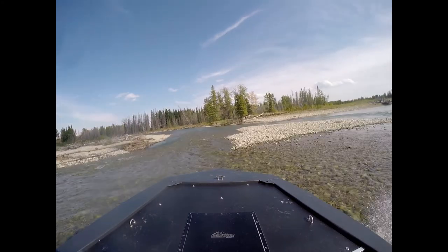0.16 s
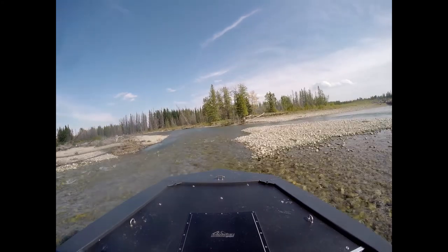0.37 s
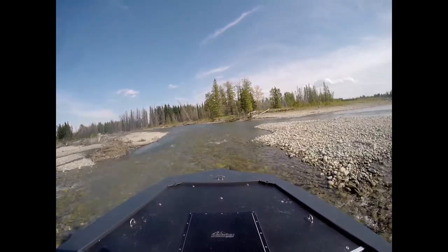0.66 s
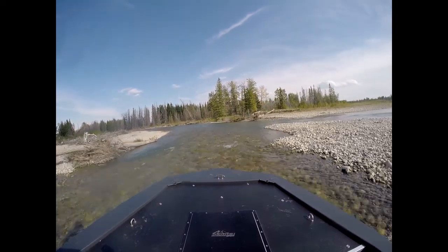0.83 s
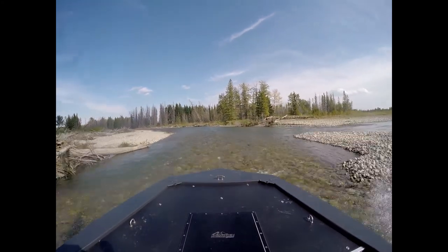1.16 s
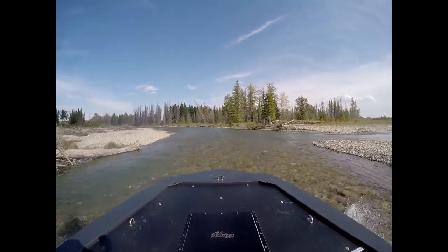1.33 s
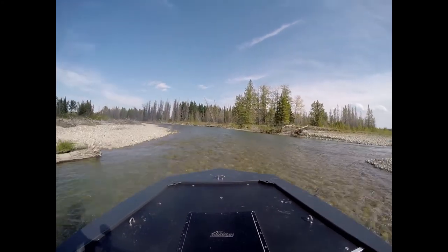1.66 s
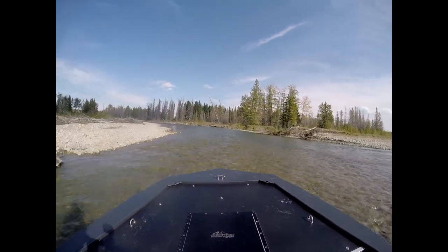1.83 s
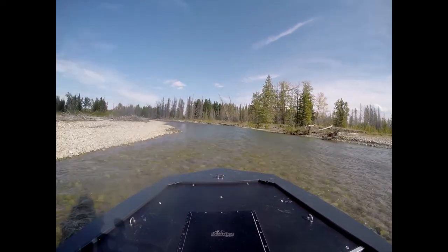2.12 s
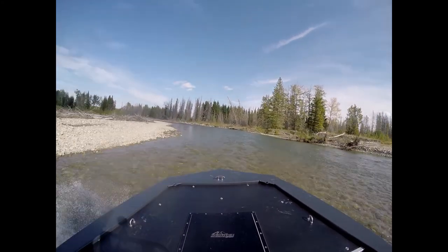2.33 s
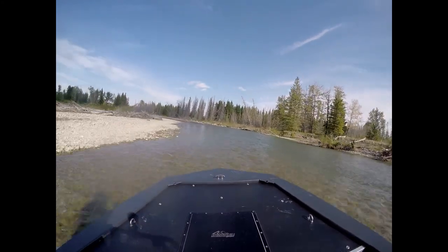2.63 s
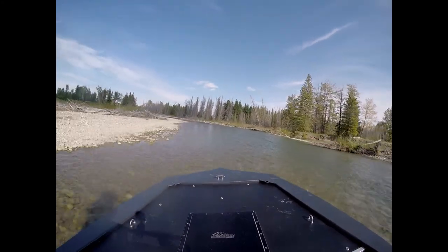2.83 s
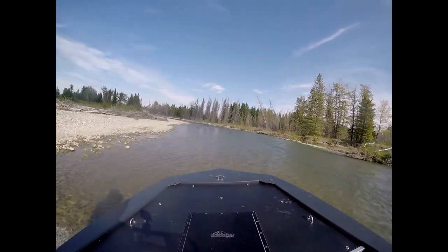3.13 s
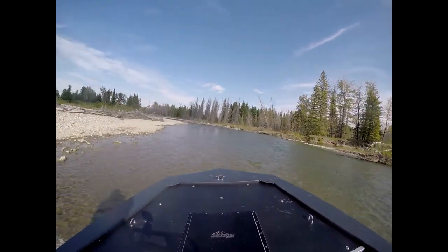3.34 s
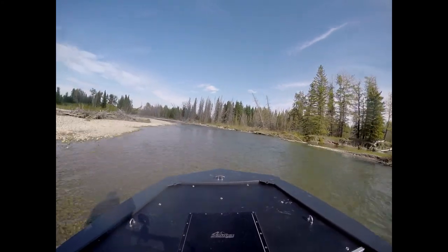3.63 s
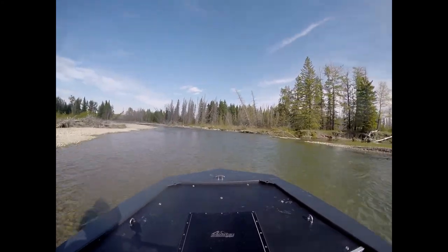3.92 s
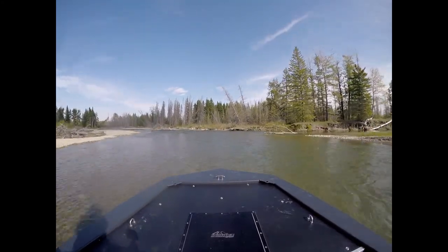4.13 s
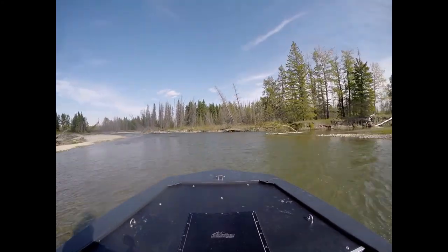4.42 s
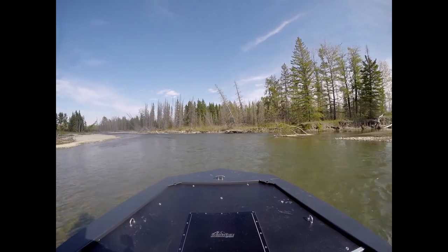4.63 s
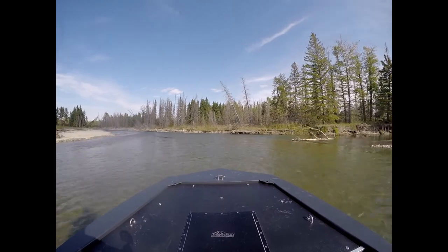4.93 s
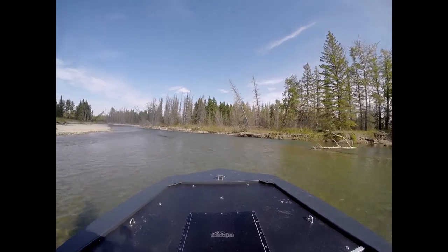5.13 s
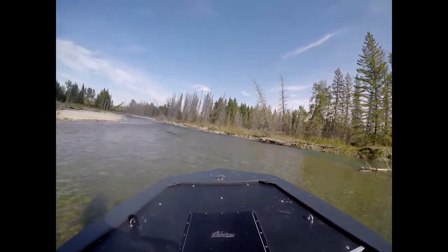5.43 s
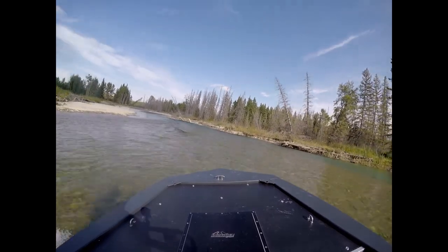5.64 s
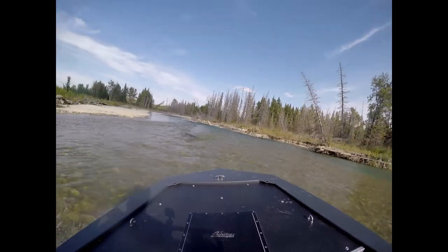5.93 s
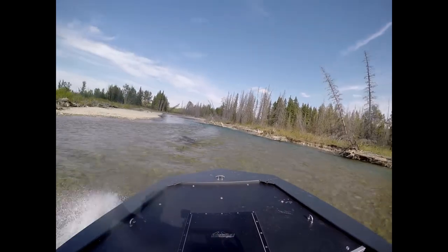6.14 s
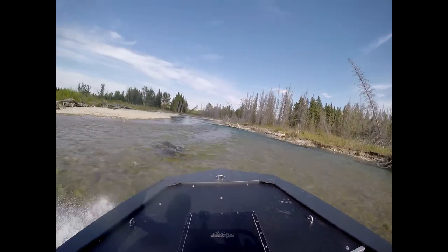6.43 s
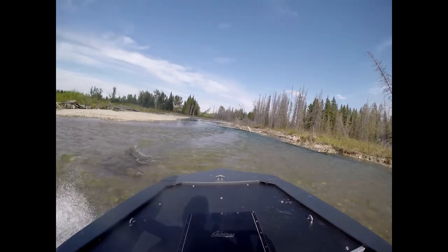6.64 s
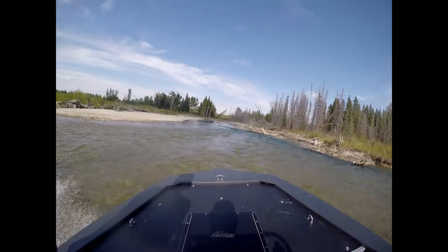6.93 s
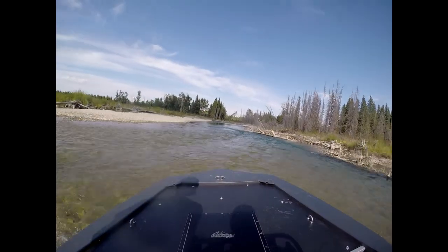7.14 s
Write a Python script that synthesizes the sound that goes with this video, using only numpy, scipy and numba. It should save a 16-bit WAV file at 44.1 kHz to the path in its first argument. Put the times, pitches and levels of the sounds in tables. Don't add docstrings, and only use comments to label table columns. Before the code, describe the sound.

Heard from a sealed camera bolted to the deck, a three-cylinder boat engine starts at full roar, drops abruptly, then pumps up and down. Hull slaps thud, gravel clacks on the plating, hardest near two seconds, with short splashes. Knocks thin out later, the engine pulls hard past five seconds, and a last slap and stone hit come near the end.

```python
import sys
import numpy as np
from scipy import signal
from scipy.io import wavfile
from scipy.ndimage import uniform_filter1d
from numba import njit

SR = 44100
rng = np.random.default_rng(int(sys.argv[2]) if len(sys.argv) > 2 else 0)


def invert_db(x):
    u = np.asarray(x, float) / 20
    return 10 ** u


def waveform_to_disk(signal):
    frames = np.transpose(np.atleast_2d(signal))
    scaled = np.clip(frames, -1, 1) * 32767
    samples = np.round(scaled).astype(np.int16)
    wavfile.write(sys.argv[1], SR, samples)


N = 320607
T = np.arange(N) / SR


def unit(x):
    return x / np.sqrt(np.mean(x ** 2))


def noise():
    return rng.standard_normal(N)


def curves(table):
    times, *columns = np.transpose(table)
    return [np.interp(T, times, column) for column in columns]


def swells(table):
    return sum(db * np.exp(-.5 * ((T - s) / length * 2) ** 2) for s, db, length in table)


def passed_db(table, hz):
    f, db = np.transpose(table)
    return np.interp(np.log(hz), np.log(f), db)


def walk(rate):
    hold = int(SR / rate)
    steps = np.repeat(rng.standard_normal(N // hold + 1), hold)
    return uniform_filter1d(uniform_filter1d(steps, hold), hold)[:N]


def lag(x, s):
    a = np.exp(-1 / (s * SR))
    return signal.lfilter([1 - a], [1, -a], x - x[0]) + x[0]


@njit
def svf(x, hz, width):
    y, band, low = np.empty(len(x)), 0., 0.
    for i in range(len(x)):
        g, k = np.tan(np.pi * hz[i] / SR), width / hz[i]
        v = (band + g * (x[i] - low)) / (1 + g * (g + k))
        band, low, y[i] = 2 * v - band, low + 2 * g * v, k * v
    return y


def resonate(x, hz, width):
    centre = hz * np.ones(N)
    return svf(svf(x, centre, 1.24 * width), centre, 1.24 * width)


def body(modes, gate, flicker_db, locked=0.):
    out = np.zeros(N)
    for hz, width, db in modes:
        ring = unit(resonate(gate * noise() + locked, hz, width))
        out += invert_db(db + flicker_db * walk(10)) * ring
    return out


# (time [s], engine cycle the lever asks for [Hz])
THROTTLE = [(0.0, 58.17), (0.153, 53.6), (0.292, 26.86), (0.655, 42.15), (0.972, 22.25), (1.49, 33.65),
            (1.777, 38.08), (2.051, 42.3), (2.529, 46.4), (2.722, 39.45), (3.013, 40.6), (3.18, 34.14),
            (3.285, 46), (3.638, 27.82), (4.073, 47.78), (4.475, 31.3), (4.857, 42), (5.079, 47.62),
            (5.489, 52.6), (5.764, 49.04), (6.055, 37), (6.391, 45.8), (6.719, 47.2), (6.944, 43.14),
            (7.192, 46)]


def revs():
    spool_s = 0.086
    times, hz = np.transpose(THROTTLE)
    lever = hz[np.searchsorted(times[1:], T)]
    cycle_hz = lag(lag(lever, spool_s), spool_s)
    return cycle_hz, lag(lever, spool_s / 2) - cycle_hz


# (time [s], exhaust level [dB], intake air relative to exhaust [dB])
EFFORT = [(0.0, -18.5, -19.5), (0.3, -22, -16), (0.6, -28, -16), (0.8, -20.5, -20.5), (0.97, -21, -18),
          (1.15, -31.5, -18.5), (1.35, -32.5, -12.5), (1.75, -28, -15), (2.2, -26.5, -16.5),
          (2.55, -24, -18), (3.45, -21.5, -19.5), (3.9, -24, -16.5), (4.05, -26.5, -14),
          (4.4, -18.5, -16.5), (4.75, -25.5, -19), (5.2, -17, -18), (6.1, -24, -20.5), (7.27, -23, -18)]
# (time [s], level change [dB], length [s])
SURGES = [(0.417, 0, 0.054), (0.746, 1.5, 0.032), (1.155, 4.5, 0.068), (1.43, 3, 0.05), (1.932, 3.5, 0.089),
          (2.566, 1.5, 0.18), (4.293, 1.5, 0.031), (4.51, -1.5, 0.042), (5.001, -0.5, 0.07),
          (6.668, 3, 0.05), (7.233, 2.5, 0.025)]


def effort():
    roar_db, intake_db = curves(EFFORT)
    return roar_db + swells(SURGES), intake_db


# (centre [Hz], width [Hz], level [dB])
CASE_LOW = [(435, 83, -20), (492.5, 64, -14.5), (584, 107, -10), (689, 56, -16), (862.3, 111, 0.5),
            (961.5, 98, -4), (1120, 161, -4), (1306, 80, -21), (1577, 110, -13.5), (1765, 130, -11),
            (1882, 102, -9)]
# (centre [Hz], width [Hz], level [dB])
CASE_TOP = [(2300, 610, -13), (3040, 390, -14), (3557, 450, -16.5), (4067, 300, -23.5), (4500, 400, -28),
            (5170, 470, -35.5), (6130, 1900, -30), (6980, 1500, -29.5)]


def exhaust(cycle, hz, roar_db, rush_db):
    firing = 3 * cycle
    strength = invert_db(0.81 * rng.standard_normal(int(firing[-1]) + 1))[firing.astype(int)]
    puff = 0.69 + np.exp(-(firing % 1) / .5)
    gate = strength * puff * invert_db(1.17 * walk(40))
    pattern = rng.standard_normal(128)
    clatter = np.interp((cycle + .003 * walk(20)) % 1, np.arange(128) / 128, pattern, period=1)
    roar = body(CASE_LOW, gate, flicker_db=1.2, locked=.45 * (hz / 57) ** 4 * clatter)
    rush = body(CASE_TOP, gate ** .5, flicker_db=2.0)
    return invert_db(roar_db) * unit(roar) + invert_db(rush_db) * unit(rush)


# (multiple of the cycle, level [dB])
LOW_ORDERS = [(2, -10), (3, -10), (4, -14.5)]
# (multiple of the cycle, level [dB])
UPPER_ORDERS = [(5, -42), (6, -35), (7, -46), (9, -38), (10, -45), (15, -27), (16, -30)]
# (frequency [Hz], level [dB])
HULL_PASS = [(60, -33), (100, -17.5), (128, -12), (143, -2), (155, -1.5), (172, -11), (203, -3), (235, -10)]


def firing_tone(cycle, hz, roar_db, lift_db):
    orders = []
    for k, db in LOW_ORDERS:
        load_db = 0.65 * (roar_db + 22.5)
        orders.append((k, db + passed_db(HULL_PASS, k * hz) + load_db + lift_db))
    for k, db in UPPER_ORDERS:
        dead_db = -9 * np.exp(-((k * hz - 390) / 45) ** 2)
        orders.append((k, db + 3.5 * k * np.log(hz / 57) + dead_db + 2.5 * walk(6)))
    out = np.zeros(N)
    for k, db in orders:
        phase = 2 * np.pi * k * cycle + 0.14 * k * walk(16)
        out += invert_db(db - 1.0 + 1.7 * walk(14)) * np.sin(phase)
    return out


# (frequency [Hz], level [dB])
WHINE_PASS = [(4000, -45), (5300, -72), (6200, -67.5), (6900, -56.5), (7400, -57.5), (8150, -62),
              (8700, -79.5), (10200, -78)]


def blower(cycle, cycle_hz, lead_hz):
    gear, belt_slip = 173.2, 0.008
    hz = gear * cycle_hz * (1 + belt_slip * walk(14))
    skirt = 1 / (1 + (hz / 8400) ** 30)
    shake = np.sin(4 * np.pi * cycle) + 0.98 * np.sin(6 * np.pi * cycle) + walk(150)
    phase = 2 * np.pi * np.cumsum(hz) / SR + skirt * shake + .5 * walk(60)
    tone = np.sin(phase) * invert_db(1.6 * walk(30))
    air = unit(resonate(noise(), .98 * hz, 450.0))
    boost_db = 0.26 * np.abs(lead_hz)
    level_db = passed_db(WHINE_PASS, hz) + boost_db + 1.5 * walk(9)
    low_cut_db = np.clip(4800 - hz, 0, None) / 25
    return invert_db(level_db - low_cut_db) * ((1.8 - 0.78 * skirt) * unit(tone) + 1.01 * skirt * air)


# (time [s], peak level [dB], ring [Hz], decay by 60 dB [s])
KNOCKS = [(0.81, -5, 114.9, 0.34), (0.969, 6, 145.8, 0.095), (1.227, -4.5, 152.9, 0.093),
          (1.414, 0.5, 115, 0.088), (1.528, 2, 133.8, 0.15), (1.722, -14, 144, 0.18),
          (1.951, 3, 134, 0.091), (2.517, 2, 128, 0.13), (3.09, -4, 140, 0.29), (3.329, -2.5, 148, 0.33),
          (4.05, -12, 148.2, 0.11), (5.014, -8.5, 158, 0.39), (6.601, 0, 142.5, 0.12),
          (0.679, -17.5, 232, 0.19), (3.049, -21.5, 232.5, 0.22), (4.089, -12, 261, 0.17),
          (4.799, -18.5, 285, 0.15), (4.989, -18.5, 273, 0.13), (5.269, -20, 282.3, 0.28)]


def knocks():
    out = np.zeros(N)
    for s, db, hz, t60 in KNOCKS:
        age = np.clip(T - s, 0, None)
        attack = (age > 0) * (1 - np.exp(-age / 0.0064))
        decay = 1000. ** (-age / max(t60, .02))
        out += invert_db(db) * attack * decay * np.sin(2 * np.pi * hz * age)
    return out


# (time [s], peak level [dB], decay by 60 dB [s])
STONES = [(0.153, -30, 0.016), (0.624, -13.5, 0.019), (0.722, -19.5, 0.064), (1.527, -18.5, 0.038),
          (1.923, 0, 0.032), (1.93, -5.5, 0.035), (1.937, -4, 0.023), (1.95, -6.5, 0.033),
          (2.225, -14, 0.0173), (3.58, -10, 0.03), (4.268, -19.5, 0.033), (6.3, -13, 0.032),
          (6.592, -8.5, 0.033)]
# (frequency [Hz], level [dB], share of the decay [ratio])
PLATING = [(298, -11, 1.2), (509.6, -11.5, 2.8), (673, -7, 1.2), (886, 2, 1.01), (1008, -8, 1.6),
           (1160, -19, 0.5), (1866, -15.5, 0.9), (2500, -23.5, 0.35), (3120, -22.5, 0.33),
           (4600, -34, 0.25)]


def stones():
    out = np.zeros(N)
    age = T[:SR // 4]
    attack = np.clip(age / 0.0022, 0, 1)
    for s, db, t60 in STONES:
        start = int(s * SR)
        for hz, mode_db, share in PLATING:
            strength, detune = rng.standard_normal(2)
            fade = attack * 1000. ** (-age / max(t60 * share, .005))
            ring = np.sin(2 * np.pi * hz * (1 + 0.046 * detune) * age)
            out[start:start + len(age)] += invert_db(db + mode_db + 2.0 * strength) * fade * ring
    return out


# (centre [Hz], width [Hz], level [dB])
HULL = [(65, 100, -28.5), (115, 24, -6), (148, 20, 5), (206.5, 26, -7.5), (257.8, 38, -12.5),
        (334, 190, -37.5)]


def chop(chop_db, lift_db):
    level_db = chop_db - 5.5 - 0.4 * lift_db + 3.5 * walk(12)
    return invert_db(level_db) * unit(body(HULL, 1., flicker_db=0.6))


# (time [s], level change [dB], length [s])
LIFTS = [(0.37, -11, 0.052), (0.9, 4, 0.29), (2.5, 6.5, 0.25), (2.8, -1.5, 0.18), (3.1, 5, 0.23),
         (3.3, 6.5, 0.14), (3.52, -8, 0.22), (4.27, 8, 0.063), (4.46, 8, 0.16), (5.04, 6.5, 0.037),
         (5.8, 2, 0.39), (6.38, 8, 0.36)]


def lifts():
    return swells(LIFTS)


# (start time [s], length [s], level [dB])
SHUDDERS = [(0.063, 0.89, -16), (1.088, 0.23, -18.5), (1.394, 0.17, -10.5), (1.68, 0.043, -16),
            (1.814, 0.591, -11.5), (2.547, 0.41, -15), (3.01, 0.1, -16.5), (3.151, 0.079, -18),
            (3.593, 0.72, -16.5), (4.895, 0.12, -17), (5.233, 0.16, -19), (6.53, 0.4, -15.5),
            (7.169, 0.054, -6)]


def mount():
    rest_db, swell_s = -25.5, 0.095
    shaken = sum(invert_db(db - 2.5) * ((T > s) & (T < s + length)) for s, length, db in SHUDDERS)
    swell = invert_db(rest_db) + uniform_filter1d(shaken, int(swell_s * SR))
    rumble = unit(resonate(noise(), 33., 20.0))
    ring = np.sin(2 * np.pi * 25.5 * T + .8 * walk(8)) + 0.22 * rumble
    return swell * invert_db(2.7 * walk(6.4) - 3) * unit(ring)


# (time [s], chop level [dB], spray level [dB])
WATER = [(0.0, -14.5, -68), (0.35, -18, -69), (0.6, -11, -72.5), (0.9, -17, -70), (1.35, -17, -69),
         (1.8, -15, -76), (2.15, -21, -67.5), (2.5, -14, -64.5), (2.95, -13, -72.5), (3.5, -18.5, -70.5),
         (4.05, -12.5, -75), (4.4, -8, -71), (4.8, -19, -75.5), (5.1, -11.5, -77.5), (5.6, -15, -68),
         (6.15, -20, -71.5), (6.5, -9.5, -67), (7.27, -20.5, -69)]


def water():
    return curves(WATER)


# (centre [Hz], width [Hz], level [dB])
SPRAY = [(9900, 1600, -0.56), (10800, 1300, 0.77), (11900, 1800, -2), (13300, 1800, 0), (14600, 1600, -2)]
# (time [s], peak level [dB], length [s])
SPLASHES = [
    (0.848, -57, 0.017),
    (0.968, -54, 0.017),
    (1.43, -53, 0.011),
    (1.492, -58, 0.018),
    (1.95, -59, 0.013),
    (1.97, -43.5, 0.013),
    (1.995, -57.5, 0.011),
    (2.052, -50.5, 0.016),
    (2.871, -49, 0.019),
]


def spray(spray_db):
    sheets = np.zeros(N)
    for s, db, length in SPLASHES:
        sheets += invert_db(db - 20.5) * np.exp(-.5 * ((T - s - length) / max(length / 2, .002)) ** 2)
    hiss = unit(body(SPRAY, invert_db(1.2 * walk(60)), flicker_db=1.0))
    return (invert_db(spray_db + 2 * walk(5)) + sheets) * hiss


def scene():
    cycle_hz, lead_hz = revs()
    cycle = np.cumsum(cycle_hz) / SR
    roar_db, intake_db = effort()
    chop_db, spray_db = water()
    lift_db = lifts()
    engine = exhaust(cycle, cycle_hz, roar_db, roar_db + intake_db)
    engine += firing_tone(cycle, cycle_hz, roar_db, lift_db)
    whine = blower(cycle, cycle_hz, lead_hz)
    hull = knocks() + stones() + chop(chop_db, lift_db)
    return (engine + whine + hull + mount() + spray(spray_db))[None]


def band_limit(x):
    return signal.sosfilt(signal.butter(12, 15300, fs=SR, output="sos"), x)


def record(dry):
    mix = 0.97 * np.tanh(dry / 0.88 + dry ** 3 / 3)
    return band_limit(mix)


dry = scene()
out = record(dry)
waveform_to_disk(out)
```